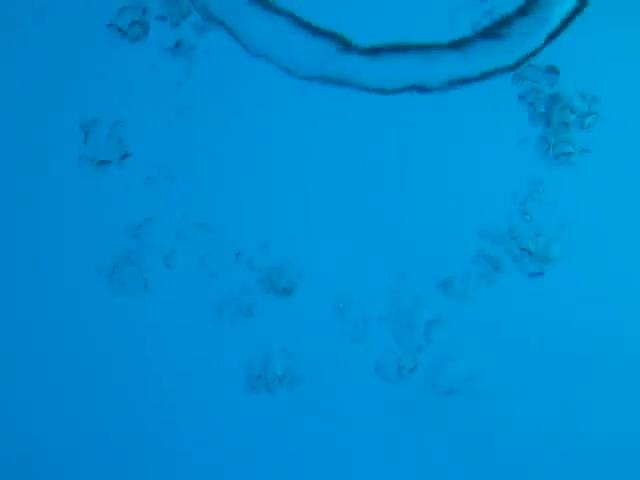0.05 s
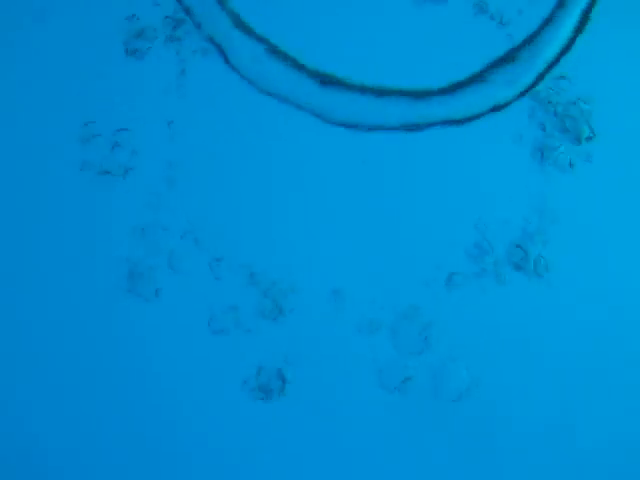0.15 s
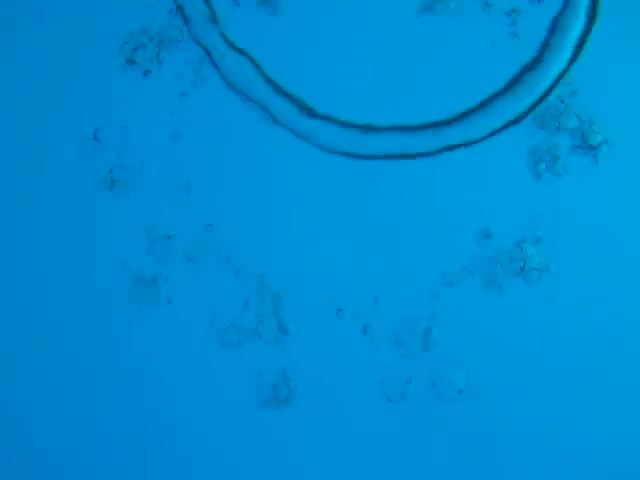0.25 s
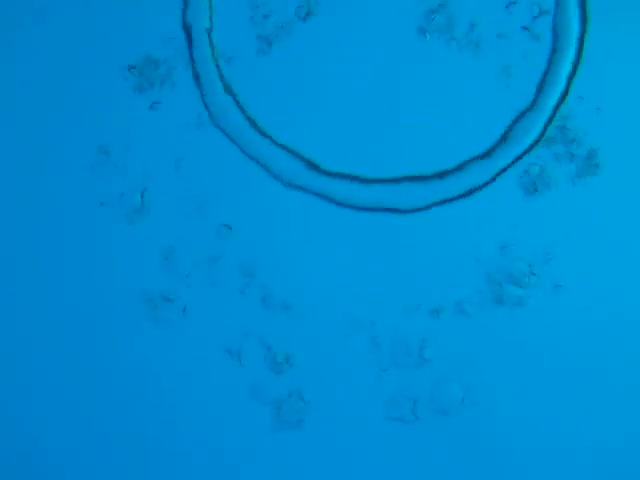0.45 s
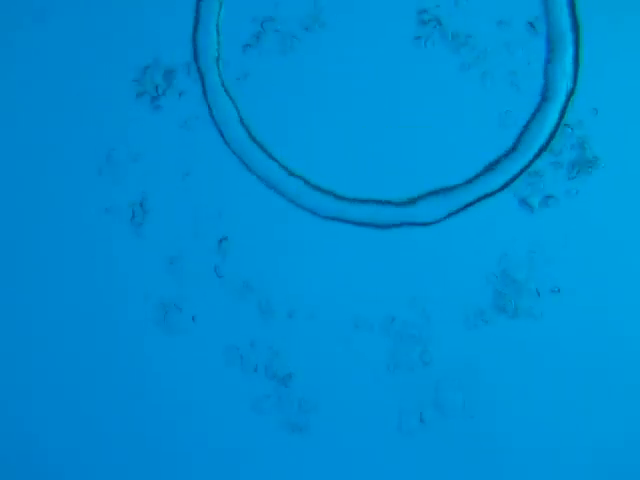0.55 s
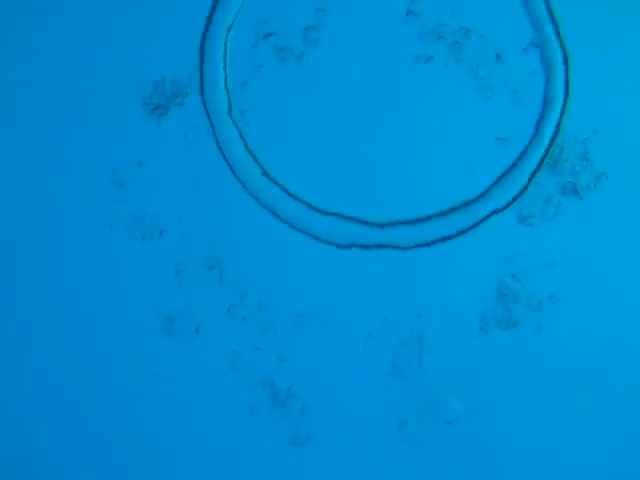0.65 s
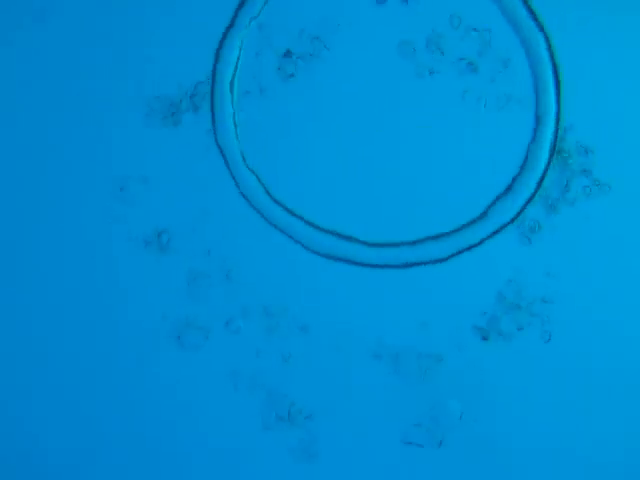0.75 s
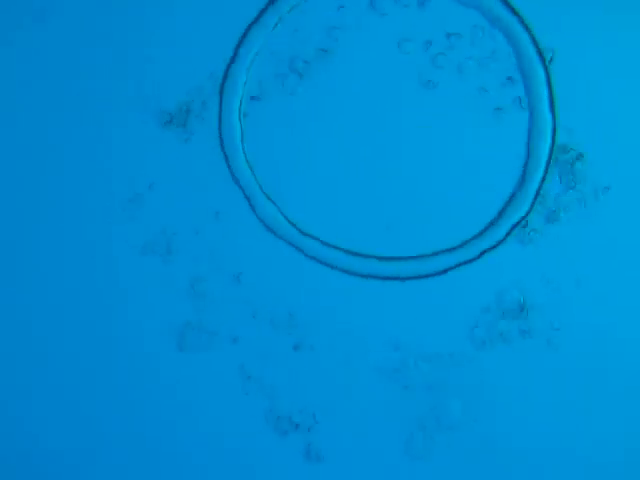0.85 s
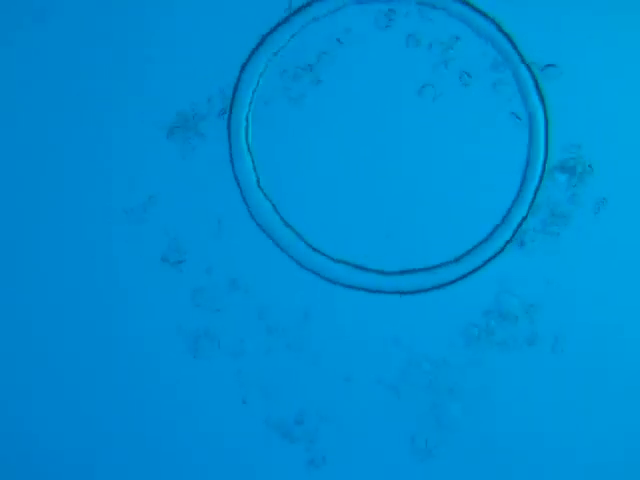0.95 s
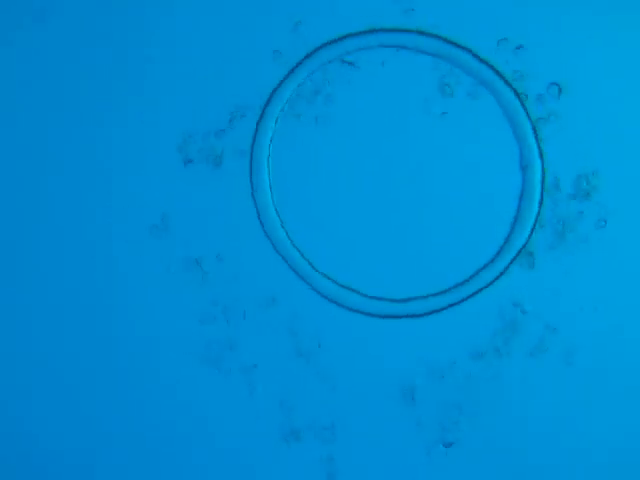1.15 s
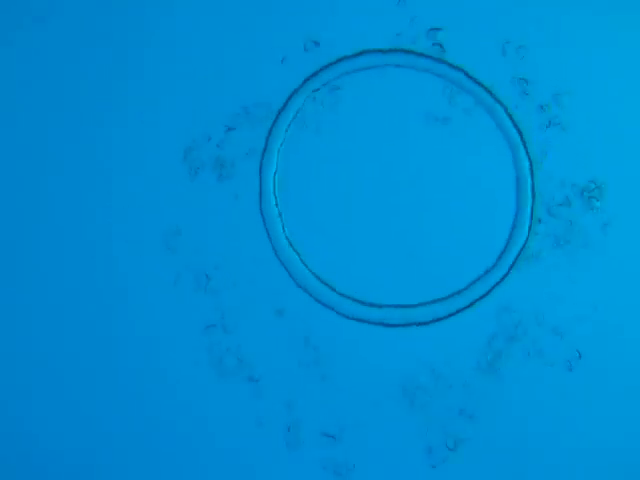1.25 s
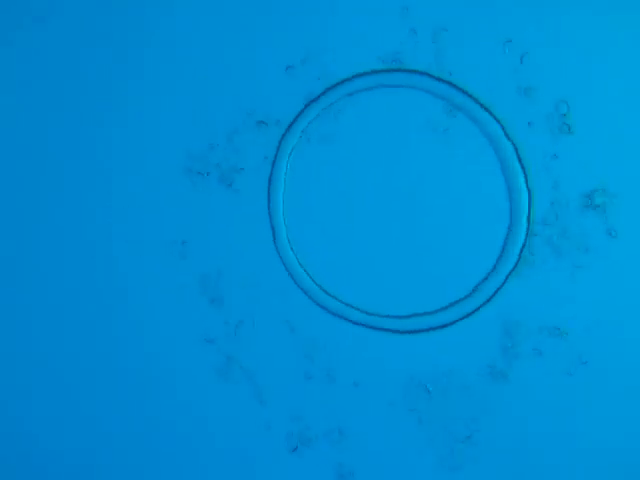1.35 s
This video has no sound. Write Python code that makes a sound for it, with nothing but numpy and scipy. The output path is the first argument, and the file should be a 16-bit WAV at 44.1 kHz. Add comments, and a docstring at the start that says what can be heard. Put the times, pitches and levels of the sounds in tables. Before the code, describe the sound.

Underwater bubbles give a short low gurgle as a ring of air drifts away, then one pops nearby and briefly rings the microphone's housing. Steady hiss, scattered tiny crackles and a far-off motor hum lie behind.

```python
"""Air ring under water

A microphone in a submerged camera housing hears a ring of air drift away among small bubbles.
A low burst of air gurgles, single bubbles ring, and one pops close by and sets the housing ringing.
A distant motor hums throughout, and faint crackles stand out of the water's even hiss."""
import sys
import numpy as np
from scipy import signal
from scipy.fft import rfft, irfft
from scipy.io import wavfile
from scipy.ndimage import uniform_filter1d

SR = 44100
rng = np.random.default_rng(int(sys.argv[2]) if len(sys.argv) > 2 else 0)


def transcribe(signal):
    """Save signal, clipped to [-1, 1], as a 16-bit WAV file at the path in sys.argv[1]."""
    frames = np.atleast_2d(signal).T
    limited = np.clip(frames, -1, 1)
    pcm = np.round(limited * 32767).astype(np.int16)
    wavfile.write(sys.argv[1], SR, pcm)


N = 61739


def amp(db):
    """Decibels to gain."""
    return 10 ** (np.asarray(db) / 20)


def unit_rms(x):
    """Scales to an rms of one."""
    return x / np.sqrt(np.mean(abs(x) ** 2) + 1e-20)


def add(mix, start_s, sound):
    """Mixes a sound in at its start time."""
    part = mix[max(round(start_s * SR), 0):][:len(sound)]
    part += sound[:len(part)]


def noise(gain_at, size):
    """Noise of rms one whose spectrum follows a function of frequency."""
    hz = np.fft.rfftfreq(size, 1 / SR) + 1e-3
    return unit_rms(irfft(rfft(rng.standard_normal(size)) * gain_at(hz), size))


def envelope(t, rise, t60, hold=0):
    """A smooth rise, a hold, then a decay of 60 dB every t60 seconds."""
    attack = np.sin(np.pi / 2 * np.minimum(t / rise, 1)) ** 2
    return attack * np.exp(-np.log(1000) * np.maximum(t - rise - hold, 0) / t60)


def ring(hz, db, rise, t60, glide=0, hold=0):
    """A dying sine whose pitch slides by the share `glide` and settles."""
    t = np.arange(SR // 2) / SR
    settle_s = 0.25 * t60
    pitch = hz * (1 + glide * (1 - np.exp(-t / settle_s)))
    return amp(db) * envelope(t, rise, t60, hold) * np.sin(2 * np.pi * np.cumsum(pitch) / SR)


# The knocks of one motor cycle. Each row: place in the cycle from 0 to 1, relative strength.
MOTOR_KNOCKS = [(.02, 0.94), (0.339, 0.76), (.70, 1.18)]
# Hum and whine from far off. Each row: multiple of the cycle rate, peak in dB before MOTOR_GAIN_DB.
MOTOR_HUM = [(1, -64), (2, -80), (3, -48), (4, -62), (5, -58), (6, -68.5), (7, -62.5), (8, -57), (9, -70),
             (10, -62), (11, -58.5), (13, -92), (14, -79), (15, -64.5), (16, -59.5), (18, -77.5), (23, -69),
             (26, -78.5), (29, -63.5), (30, -51.5), (31, -69.5), (37, -83.5)]
MOTOR_WHINE = [(46, -78), (48, -65.5), (49, -79), (51, -62.5), (52, -79.5), (57, -73), (60, -70), (64, -82),
               (69, -64), (70, -64.5), (71, -72), (75, -61.5), (76, -59.5), (77, -50.5), (78, -55),
               (80, -55.5), (81, -59), (82, -68.5), (85, -72), (86, -64.5), (88, -73.5), (94, -69.5),
               (104, -82), (130, -76.5), (165, -89)]
CYCLE_HZ, MOTOR_GAIN_DB = 20.108, 1.84
KNOCK_DECAY_S, KNOCK_GRIT = .009, 2.5
WAVER_DEPTH, WAVER_HZ = 0.19, 4


def motor():
    """A distant motor: three gritty knocks a cycle, coloured by hull and water; each harmonic wavers."""
    place = np.arange(2048) / 2048
    cycle = sum(strength * np.exp(-((place - at) % 1) / (KNOCK_DECAY_S * CYCLE_HZ))
                for at, strength in MOTOR_KNOCKS)
    spectrum = rfft(cycle * (1 + KNOCK_GRIT * rng.standard_normal(len(place))))
    orders, db = np.transpose(MOTOR_HUM + MOTOR_WHINE)
    t, out = np.arange(N) / SR, np.zeros(N)
    drift = rng.standard_normal(size=(166, 64, 2)) @ [1, 1j]  # complex: moves level and phase
    for k in range(1, len(drift)):
        phase = 2 * np.pi * k * CYCLE_HZ * t + np.angle(spectrum[k])  # the knocks set only the phases
        depth = WAVER_DEPTH * min(k / 20, 1)  # low harmonics are steadier
        waver = 1 + depth * np.interp(t * WAVER_HZ, np.arange(len(drift[k])), drift[k])
        out += amp(np.interp(k, orders, db)) * (np.exp(1j * phase) * waver).real
    return amp(MOTOR_GAIN_DB) * out


# The hiss all around the microphone. Each row: frequency in Hz, relative spectral level in dB.
HISS_SPECTRUM = [(20, -9), (60, 1.5), (180, 6), (280, -1), (450, 0.5), (540, 0.5), (595, 9), (670, 0.5),
                 (820, -6.5), (1250, -3.5), (1550, 2.5), (1850, 3.5), (2150, -4.5), (2650, -2), (3300, -5),
                 (4500, -7), (5000, -5.5), (5700, -7.5), (6500, -5.5), (7300, -9.5), (8200, -7.5),
                 (9600, -14)]
# Thin tones high in the hiss. Each row: centre in Hz, half-width in Hz, rms level in dB.
HIGH_TONES = [(7655, 37, -68.5), (8400, 28, -70.5)]
HISS_RMS_DB, PATCH_DB = -47, 2


def water_hiss():
    """The surrounding water: an even hiss with faint patches and two thin high tones."""
    points_hz, db = np.transpose(HISS_SPECTRUM)
    hiss = noise(lambda hz: amp(np.interp(np.log(hz), np.log(points_hz), db)), N)
    spectrogram = signal.stft(hiss, nperseg=256)[2]
    patches = rng.standard_normal(spectrogram.shape)
    for axis in (0, 1):  # smooth across frequency, then time
        patches = uniform_filter1d(patches, size=8, axis=axis)
    hiss = signal.istft(spectrogram * amp(PATCH_DB * unit_rms(patches)), nperseg=256)[1][:N]
    tones = sum(amp(level) * noise(lambda hz: 1 / (1 + ((hz - centre) / width) ** 2), N)
                for centre, width, level in HIGH_TONES)
    return amp(HISS_RMS_DB) * unit_rms(hiss) + tones


# Bubbles in the water around the housing. Each row: start in seconds, pitch in Hz, peak in dB,
# rise in seconds, t60 in seconds, glide as a share of the pitch.
BUBBLES = [(.178, 587.7, -45.5, 0.027, 0.57, -0.017), (.275, 585, -45, 0.011, 0.18, 0.02),
           (.3723, 220, -21, 0.0082, .03, -0.16), (.374, 1914, -31.5, .002, 0.014, 0.033),
           (.3774, 594, -24.5, .005, 0.055, 0.0059), (.378, 368, -24.5, 0.0022, 0.057, .09),
           (.387, 158.4, -23, .002, 0.15, -0.0046), (.3937, 138.8, -17.5, 0.0049, .14, -0.23),
           (.398, 400, -26.5, 0.0038, 0.043, -0.06), (.3986, 594, -32, 0.0053, 0.089, -0.021),
           (.388, 2800, -41, 0.0027, .05, -0.075), (.4, 2620, -42.5, .006, .2, -0.034),
           (.4246, 207.8, -24, 0.0087, .13, 0.14), (0.4389, 319.5, -26, .0056, 0.056, 0.021),
           (0.4424, 163, -29, .005, .058, 0.013), (.466, 2580, -39.5, 0.0027, 0.065, -0.053),
           (.592, 1310, -36, .013, 0.075, 0.0016), (.626, 2480, -37.5, 0.0037, .05, -0.02),
           (.648, 735, -34.5, 0.0061, 0.12, -0.042), (.669, 2510, -38, .002, .02, 0.044),
           (.669, 2840, -38.5, 0.0026, 0.046, -0.0028), (.672, 632.6, -31.5, 0.012, 0.16, 0.055),
           (.645, 178.4, -40, 0.017, 0.1, -0.056), (.65, 297, -49, 0.012, 0.09, -0.039),
           (.819, 663, -24, 0.004, 0.021, -0.024), (.822, 190, -33, 0.006, 0.075, -0.026),
           (.836, 610, -32, .003, 0.022, 0.084), (.837, 813, -42, .004, 0.077, 0.31),
           (1.041, 1940, -39.5, 0.0033, 0.058, -0.14), (1.04, 653, -47, 0.0083, 0.061, 0.031),
           (1.168, 509, -40, 0.013, 0.056, -0.28), (1.198, 593, -42, 0.0061, .08, -0.073)]
PUSH_AT_S, PUSH_WIDTH_S, PUSH_DB, PUSH_SWING_HZ = .3997, .006, -20.5, 68


def bubbles():
    """Each bubble rings at its own pitch; the largest also pushes the water against the microphone."""
    from_push = np.arange(N) / SR - PUSH_AT_S
    swing = np.cos(2 * np.pi * PUSH_SWING_HZ * from_push)
    out = -amp(PUSH_DB) * swing * np.exp(-(from_push / PUSH_WIDTH_S) ** 2)
    for start, hz, db, rise, t60, glide in BUBBLES:
        add(out, start, ring(hz, db, rise, t60, glide))
    return out


def snap(db, t60, centre_hz, width_octaves=0.51):
    """A tiny snap, smeared to a short puff of treble."""
    t = np.arange(SR // 10) / SR
    puff = noise(lambda hz: 1 / (1 + (np.log2(hz / centre_hz) / width_octaves) ** 2), len(t))
    return amp(db) * envelope(t, rise=0.00073, t60=t60) * puff


# Snaps that stand out of the hiss. Each row: start in seconds, rms level at the crest in dB,
# t60 in seconds, centre in Hz.
CRACKLES = [(.243, -31, 0.013, 6200), (.335, -39, 0.012, 5500), (.385, -43, .015, 5500),
            (.437, -45, 0.032, 6500), (0.444, -35, 0.0081, 5800), (0.4667, -40, 0.02, 6700),
            (.59, -47.5, .04, 5460), (0.608, -44, .014, 5100), (.683, -40, .015, 5400),
            (.691, -38, 0.033, 6500), (.7783, -34.5, 0.015, 7000), (.86, -32, 0.021, 3220),
            (0.8655, -35.5, 0.022, 6200), (1.098, -45, .015, 4800), (1.18, -42, 0.011, 6600),
            (1.2412, -39, .012, 8000), (1.245, -36.5, .028, 6800), (1.257, -39, .018, 6800),
            (1.305, -45.5, 0.011, 4300)]
FIZZ_PER_S, FIZZ_DB, FIZZ_SPREAD_DB = 30, -53, 5


def crackles():
    """A few clear snaps in the water and a random fizz of faint ones."""
    out = np.zeros(N)
    for start, db, t60, centre_hz in CRACKLES:
        add(out, start, snap(db, t60, centre_hz))
    for when, strength in rng.random((int(FIZZ_PER_S * N / SR), 2)):
        db = FIZZ_DB + FIZZ_SPREAD_DB * (2 * strength - 1)
        add(out, when * N / SR, snap(db, t60=.009, centre_hz=6000))
    return out


# Water churning around the escaping air. Each row: start in seconds, rms level at the crest in dB,
# rise in seconds, t60 in seconds, upper edge in Hz.
CHURNS = [(.366, -36, 0.016, 0.32, 503), (.434, -41, 0.012, 0.074, 346), (.819, -39.5, 0.0036, 0.14, 894)]
CHURN_LOW_HZ = 90


def churn():
    """Low turbulence that swells and dies as air tears loose."""
    t, out = np.arange(SR // 4) / SR, np.zeros(N)
    for start, db, rise, t60, top_hz in CHURNS:
        swirl = noise(lambda hz: ((1 + (hz / top_hz) ** 10) * (1 + (CHURN_LOW_HZ / hz) ** 2)) ** -.5,
                      len(t))
        add(out, start, amp(db) * envelope(t, rise, t60) * swirl)
    return out


# Modes of the housing around the microphone. Each row: pitch in Hz, peak in dB, t60 in seconds.
HOUSING_MODES = [(200, -26.5, 0.31), (281, -23.5, 0.021), (361, -32, .02), (608, -37.5, 0.082),
                 (1143, -37.5, 0.095), (1374, -22.5, .016), (1689, -29.5, .095), (2088, -23.5, .0113),
                 (2342, -31, .076), (2520, -17, 0.018), (4220, -40, 0.015)]
POP_AT_S, POP_RISE_S = .8601, 0.0018


def close_pop():
    """A bubble close to the microphone chirps downward and knocks the housing, which rings."""
    out = np.zeros(N)
    add(out, POP_AT_S, ring(hz=2013, db=-15.5, rise=POP_RISE_S, t60=.04, glide=-.177, hold=0.0038))
    for hz, db, t60 in HOUSING_MODES:
        add(out, POP_AT_S, ring(hz, db, POP_RISE_S, t60))
    return out


def scene():
    """Everything, near and far, reaches one microphone inside the housing."""
    return (motor() + water_hiss() + bubbles() + churn() + close_pop() + crackles())[None]


# The recorder's treble roll-off. Each row: frequency in Hz, gain in dB.
TREBLE_ROLL_OFF = [(7600, 0.5), (8300, -4.5), (8900, -10.5), (9500, -15), (9900, -20.5)]
CUTOFF_HZ = 9800


def record(dry):
    """The recorder dulls the top of the treble, then cuts it off steeply."""
    points_hz, db = np.transpose(TREBLE_ROLL_OFF)
    gain = amp(np.interp(np.fft.rfftfreq(2 * N, 1 / SR), points_hz, db))
    dulled = irfft(rfft(dry, 2 * N) * gain)[:, :N]
    lowpass = signal.firwin(301, CUTOFF_HZ, window=("kaiser", 9), fs=SR)
    return signal.oaconvolve(dulled, lowpass[None], "same")


dry = scene()
out = record(dry)
transcribe(out)
```